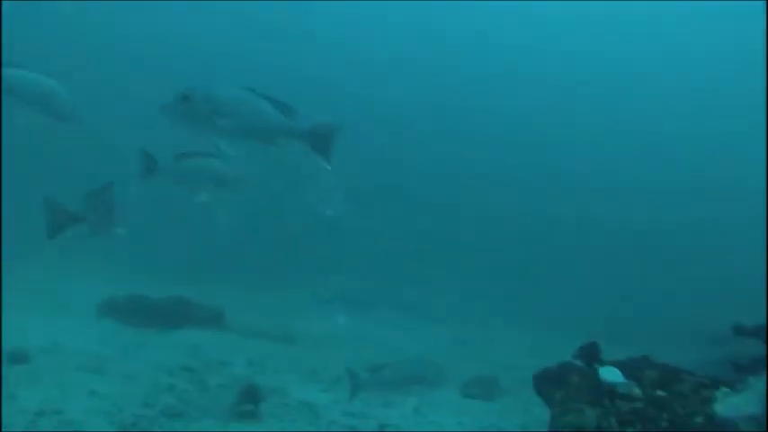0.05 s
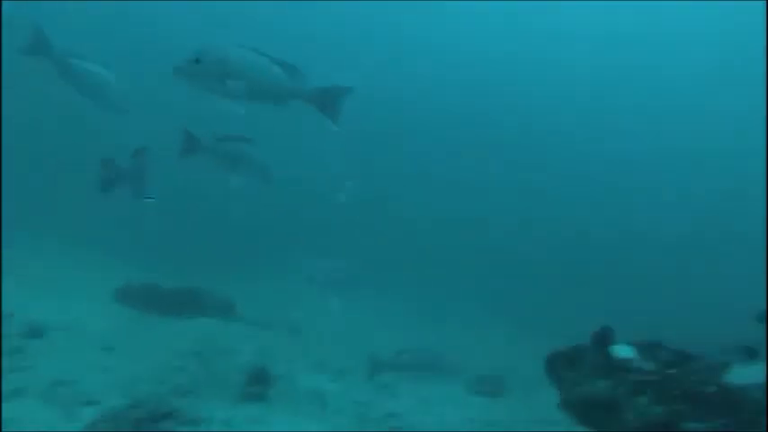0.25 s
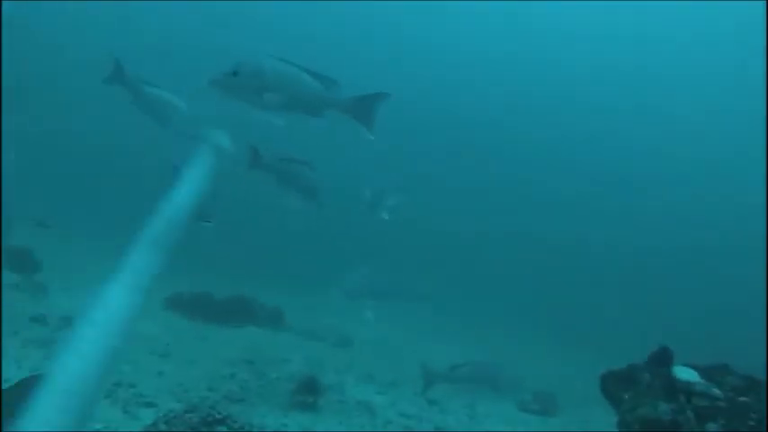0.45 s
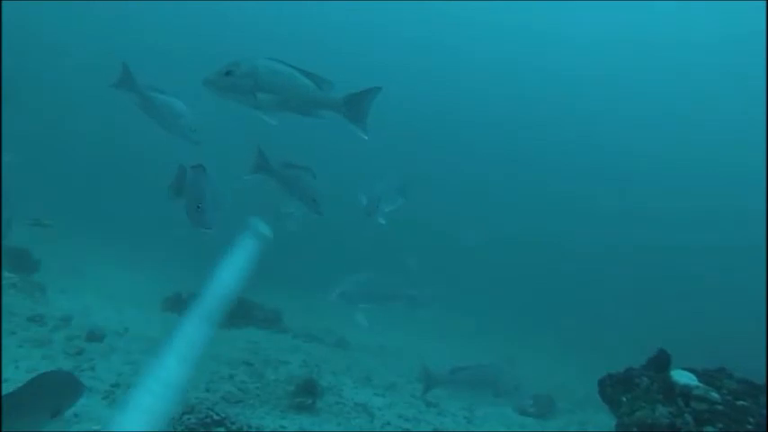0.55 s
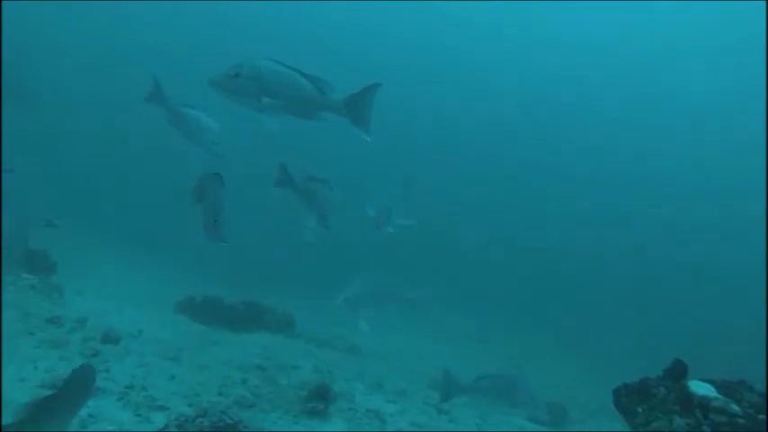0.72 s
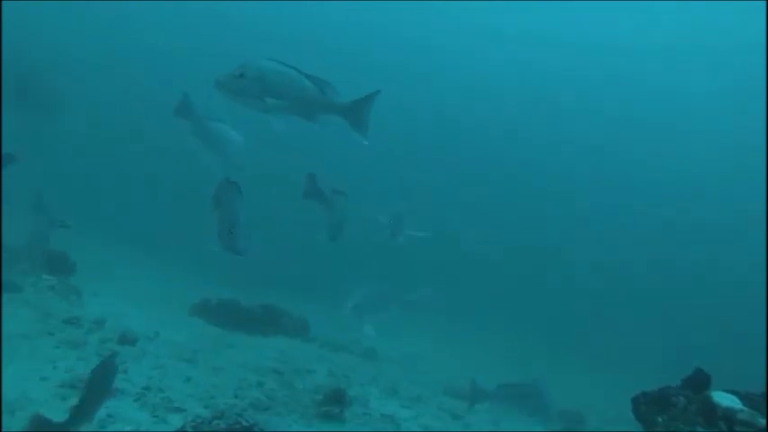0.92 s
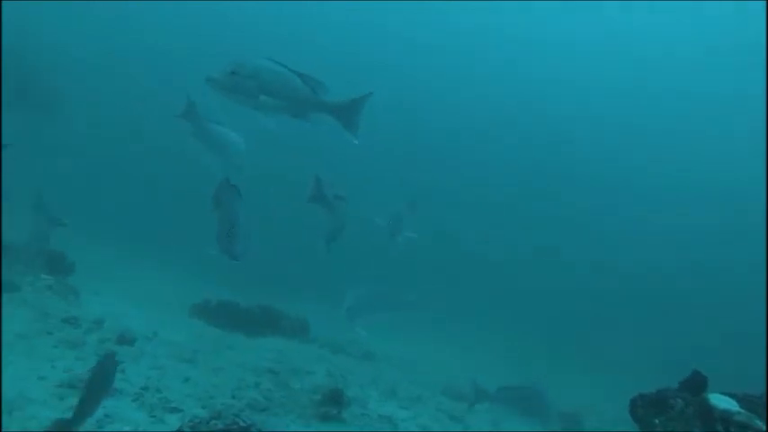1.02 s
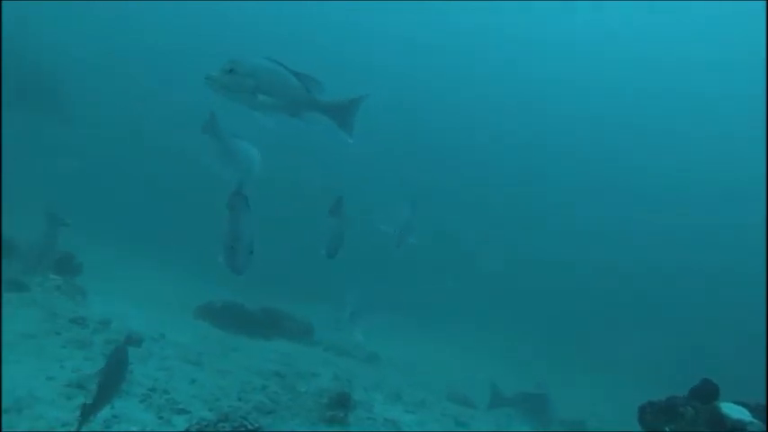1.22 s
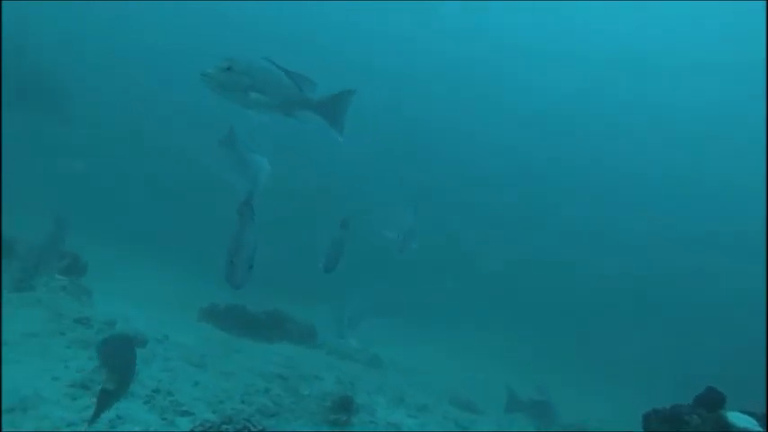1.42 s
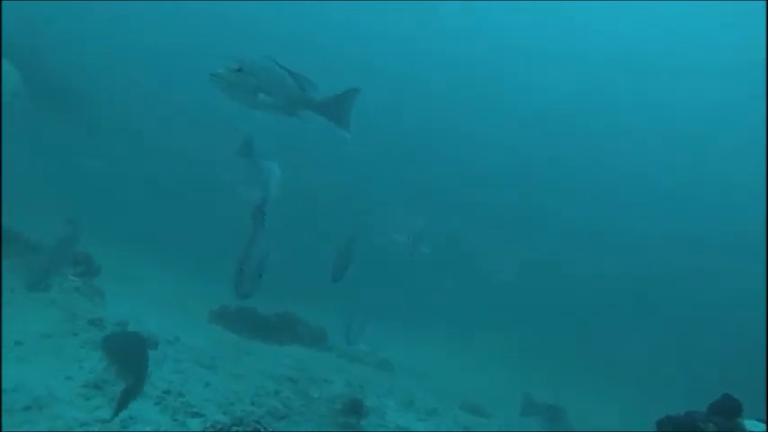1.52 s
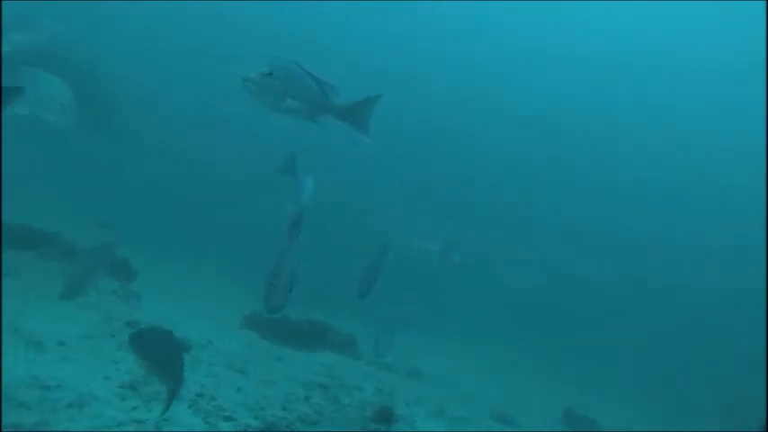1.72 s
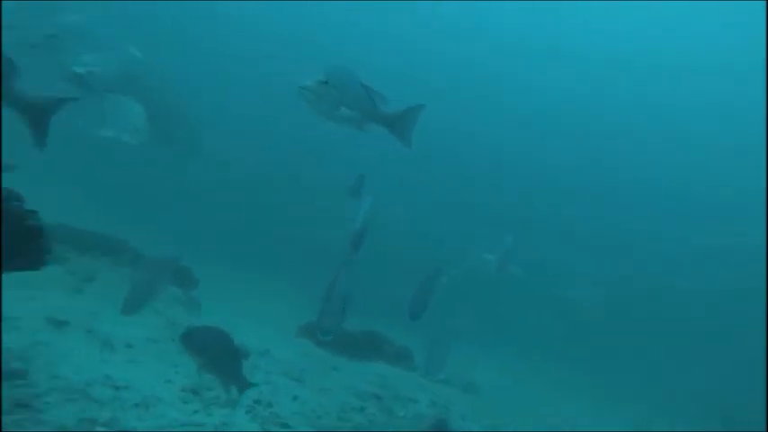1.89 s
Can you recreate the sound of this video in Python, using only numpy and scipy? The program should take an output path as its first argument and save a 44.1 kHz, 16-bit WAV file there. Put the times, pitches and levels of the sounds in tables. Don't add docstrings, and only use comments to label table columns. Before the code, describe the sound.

Underwater spear gun shot, a sharp cracking clack with a short thud and brief line rattle

```python
import sys
import numpy as np
from scipy import signal
from scipy.fft import rfft, irfft, next_fast_len
from scipy.io import wavfile
from scipy.ndimage import map_coordinates

SR = 44100
rng = np.random.default_rng(int(sys.argv[2]) if len(sys.argv) > 2 else 0)


def makeup_ratio(level_db):
    decades = np.asarray(level_db, float) / 20
    return 10 ** decades


def to_wav(sig):
    pcm = np.clip(np.atleast_2d(sig), -1, 1) * 32767
    pcm = np.round(pcm).astype(np.int16)
    wavfile.write(sys.argv[1], SR, pcm.T)


N = 85995

# (time [s], level [dB])
HISS_LEVEL = [
    (0.0, -62.5),
    (1.536, -62.5),
    (1.95, -61.5),
]
# (frequency [Hz], density [dB per Hz])
HISS_COLOUR = [(15, -23.5), (35, 5), (80, 0), (150, 0), (500, -7), (1100, -10), (2000, -11.5),
               (4500, -19.5), (9500, -26), (14400, -31), (15700, -46)]
# (time [s], peak level [dB], pitch [Hz])
SHRIMP_SNAPS = [(0.6164, -55, 6750), (0.839, -60.5, 5860), (1.1155, -58, 5060), (1.2356, -53.5, 7330),
                (1.255, -59, 6730), (1.4376, -51, 9820), (1.4425, -52.5, 9950), (1.080, -59, 9400),
                (1.682, -62, 11080), (1.5835, -60, 6420), (1.7025, -55.5, 7297), (1.8309, -56, 9300)]
# (time [s], peak level [dB], pitch [Hz])
RISING_BUBBLES = [(1.319, -53.5, 853), (1.544, -53.5, 1520), (1.624, -56, 892), (1.679, -55, 501),
                  (1.709, -48, 945), (1.759, -53, 1050), (1.776, -49.5, 1120), (1.844, -52, 1100),
                  (1.903, -56, 1820)]

# (time [s], level [dB])
CHURN_LEVEL = [
    (.25, -34.5),
    (.272, -41.5),
    (.31, -46),
    (.33, -58),
    (.39, -55),
    (.43, -50),
    (.452, -74),
    (.6, -95),
]
# (frequency [Hz], density [dB per Hz])
CHURN_COLOUR = [(60, -22), (150, 2.5), (330, -6.5), (490, 1), (1000, -7), (1600, -6.5), (4300, -23),
                (5500, -51.5)]

# (time [s], peak level [dB], pitch [Hz], rise [s])
LINE_KNOCKS = [(0.2639, -30, 2110, 0.0016), (0.2685, -37, 2140, 0.0009), (0.2697, -25, 2250, 0.0018),
               (0.2788, -23, 2310, 0.0018), (0.2865, -36, 2060, 0.0014), (0.2922, -37, 2170, 0.0009),
               (0.2953, -33, 2240, 0.001), (0.3027, -30, 2080, 0.0009), (0.309, -46, 4000, 0.0014),
               (0.3108, -37, 2180, 0.0014), (0.3167, -36, 2070, 0.0008), (0.321, -40, 2290, 0.0012),
               (0.3265, -48, 4200, 0.0016), (0.3325, -50, 4500, 0.0014), (0.3422, -19.5, 1830, 0.0016),
               (0.3448, -27, 1930, 0.0016), (0.3534, -42, 1920, 0.001), (0.359, -50, 4100, 0.001),
               (0.3593, -42, 2190, 0.001), (0.3663, -40, 2180, 0.0011), (0.3695, -43, 1990, 0.0009),
               (0.371, -41, 2160, 0.001), (0.3734, -39, 2100, 0.0015), (0.3778, -41, 2020, 0.0013),
               (0.3879, -33, 2160, 0.0015), (0.3912, -43, 1980, 0.0008), (0.3983, -40, 2390, 0.0019),
               (0.4158, -35, 2270, 0.0013), (0.4177, -39, 2180, 0.0022), (0.4327, -36, 2050, 0.0015),
               (0.4365, -42, 2290, 0.0011)]
# (time [s], peak level [dB], pitch [Hz], rise [s])
SLACK_KNOCKS = [(0.4661, -41, 2310, 0.001), (0.4832, -35, 2390, 0.0022), (0.4998, -39, 2330, 0.0015),
                (0.5374, -47, 2290, 0.001), (0.551, -32, 2350, 0.0012), (0.5549, -43, 2110, 0.0007),
                (0.558, -47, 1930, 0.0011), (0.5845, -38, 2330, 0.0013), (0.5905, -46, 2320, 0.001),
                (0.6006, -37, 2270, 0.0012), (0.6023, -37, 2290, 0.0013), (0.6562, -38, 2300, 0.0011),
                (0.6661, -43, 2260, 0.0013), (0.689, -45, 2230, 0.0009), (1.0502, -49, 2160, 0.001),
                (1.058, -45, 2160, 0.0011), (1.0723, -41, 2190, 0.0011), (1.0741, -52, 2360, 0.0006),
                (1.0798, -46, 2310, 0.0011), (1.6228, -49, 2050, 0.0011)]
# (pitch ratio [1], relative level [dB])
KNOCK_SIDE_MODES = [(.52, -13), (.25, -21), (1.85, -21), (.74, -13), (1.35, -18)]
# (time [s], level [dB])
RUSTLE_LEVEL = [
    (.255, -55),
    (.30, -48),
    (.34, -50),
    (.44, -58),
    (.46, -61),
    (.56, -55),
    (.62, -70),
    (.70, -68),
    (.8, -76),
]
# (frequency [Hz], density [dB per Hz])
RUSTLE_COLOUR = [(500, -31), (1200, -14), (1700, -5.5), (2300, 0.5), (2800, -12), (4300, -17), (5300, -35),
                 (9000, -59.5)]

# (frequency [Hz], level [dB])
SHUDDER_MODES = [(75, -33.5), (148, -33.5), (250, -46)]
# (time [s], level [dB], pitch [Hz], rise [s], 60 dB decay [s])
RUBBER_SLAPS = [
    (0.2423, -17.5, 43.3, 0.015, 0.1),
    (0.25, -19, 194, 0.0029, 0.023),
    (0.25, -9.5, 285, 0.00045, .012),
    (0.407, -48.5, 34, 0.02, 0.19),
    (.53, -50, 36.3, 0.058, 0.24),
    (.68, -58.5, 47, 0.0298, 0.26),
    (1.69, -56, 42.1, 0.024, 0.28),
    (1.67, -64.5, 162, .09, 1.8),
    (.475, -56, 33, .04, .3),
]

# (delay [s], pitch [Hz], relative level [dB], rise [s], 60 dB decay [s])
TRIGGER_MODES = [
    (0, 549, -1, 0.0028, 0.005),
    (.0004, 1744, -8, 0.0021, 0.0054),
    (.0045, 1780, -27.5, 0.0011, 0.028),
    (0, 2870, -29.5, 0.0028, .005),
    (.0035, 690, -17, 0.0014, 0.0057),
    (.008, 296, -31, 0.0016, 0.0087),
]

# (time [s], peak level [dB], pitch [Hz], rise [s])
SHAFT_JOLTS = [(0.2306, -23, 3440, 0.0012), (0.2308, -16, 2280, 0.0009), (0.2321, -9, 2150, 0.0011),
               (0.2328, -13, 1330, 0.002), (0.2334, -21, 4100, 0.0006), (0.2335, -12, 2160, 0.0006),
               (0.2342, -17, 3510, 0.0005), (0.2342, -6, 2330, 0.0013), (0.2347, -17, 3190, 0.0006),
               (0.2355, -14, 3460, 0.0008), (0.2361, -5, 2430, 0.001), (0.2372, -18, 3410, 0.0006),
               (0.2374, -23, 1060, 0.0017), (0.2378, -14, 1960, 0.001), (0.2391, -23, 3560, 0.0006),
               (0.2397, -23, 3490, 0.0005), (0.2398, -6, 2080, 0.001), (0.2404, -16, 1150, 0.0012),
               (0.2406, 0.5, 2250, 0.0019), (0.2409, -18, 3580, 0.0009), (0.242, -16, 1290, 0.001),
               (0.2423, -22, 3870, 0.0006), (0.2429, -24, 3990, 0.0006), (0.2441, -21, 4260, 0.0005),
               (0.2441, -14, 2090, 0.001), (0.2448, -22, 4340, 0.0007), (0.2453, -6, 2160, 0.0009),
               (0.2463, -21, 3640, 0.0004), (0.2471, -21, 1260, 0.001), (0.248, -12, 2420, 0.001),
               (0.2491, -21, 950, 0.0009), (0.2497, -19, 1850, 0.0009), (0.2505, -15, 2170, 0.001),
               (0.2506, -6, 1360, 0.0013), (0.2515, -18, 3730, 0.0006), (0.2516, -13, 2110, 0.001),
               (0.2523, -24, 3560, 0.0008), (0.2533, -17, 1420, 0.0009), (0.2537, -23, 4340, 0.001),
               (0.2538, -17, 2170, 0.0013), (0.2545, -22, 1210, 0.0013), (0.2559, -23, 1290, 0.0014),
               (0.256, -24, 4430, 0.0006), (0.256, -15, 2280, 0.001), (0.2574, -17, 2220, 0.0012),
               (0.2597, -24, 2180, 0.0014)]
# (time [s], peak level [dB], pitch [Hz], rise [s])
OUTER_JOLTS = [
    (.2501, -18, 750, .001),
    (.2563, -24, 7000, .0005),
    (.2345, -24, 690, .002),
]
# (time [s], level [dB])
SCRAPE_LEVEL = [
    (.2296, -62.5),
    (.2305, -42),
    (.234, -31),
    (.2572, -26.5),
    (.2605, -47),
    (.29, -57.5),
    (.30, -62),
]
# (frequency [Hz], density [dB per Hz])
GRIT_COLOUR = [(150, -15.5), (300, -7.5), (1300, -0.5), (2200, -2), (3300, -4), (4600, -8.5), (7000, -18.5),
               (11000, -36), (15500, -51.5)]

# (start [s], end [s], edge [Hz]: losses grow from about half of it, surviving lines
THINNED = [(.088, .132, 5000), (.306, .320, 6000), (.548, .562, 6000), (.778, .796, 6000),
           (.812, .832, 5000), (.988, 1.022, 6000), (1.134, 1.152, 6000), (1.178, 1.196, 5000),
           (1.264, 1.280, 6000), (1.308, 1.352, 5000), (1.482, 1.50, 5000), (1.634, 1.652, 5000),
           (1.738, 1.754, 5000)]
# (start [s], end [s], above [Hz])
DULLED = (.30, .72, 5500)


def unit(x):
    return x / np.sqrt(np.mean(x ** 2) + 1e-20)


def curve(rows):
    times, levels = np.transpose(rows)
    return np.interp(np.arange(N) / SR, times, levels, left=-120, right=-120)


def wobble(rate):
    knots = rng.standard_normal(int(N * rate / SR) + 4)
    return map_coordinates(knots, [np.arange(N) * rate / SR])


def noise(spectrum):
    size = next_fast_len(N + 8192)
    hz, db = np.transpose(spectrum)
    gain = makeup_ratio(np.interp(np.log(np.fft.rfftfreq(size, 1 / SR) + 1), np.log(hz + 1), db))
    return unit(irfft(rfft(rng.standard_normal(size)) * gain, size)[:N])


def ring(start_s, db, hz, rise_s, t60_s, glide=0):
    out = np.zeros(N)
    first = int(start_s * SR) + 1
    last = min(N, int((start_s + rise_s + 1.5 * t60_s) * SR))
    t = np.arange(first, last) / SR - start_s
    onset = np.sin(np.pi / 2 * np.minimum(t / rise_s, 1)) ** 2
    decay = makeup_ratio(-60 * np.maximum(t - rise_s, 0) / t60_s)
    out[first:first + len(t)] = makeup_ratio(db) * (onset * decay) * np.sin(2 * np.pi * hz * t * (1 + glide * t))
    return out


def reef():
    level_db = curve(HISS_LEVEL)
    mean_db = np.mean(np.transpose(HISS_LEVEL)[1])
    swell_db = 0.77 * (level_db - mean_db)
    flutter_db = .7 * wobble(9) + .7 * wobble(50)
    hiss = makeup_ratio(mean_db + swell_db + 2 + flutter_db) * noise(HISS_COLOUR)
    snaps = np.zeros(N)
    for s, db, hz in SHRIMP_SNAPS:
        for ratio in (.8, 1, 1.3):
            snaps += ring(s, db + 2.5, hz * ratio, 0.00018, 0.005) / 2
    bubbles = sum(ring(s, db - 1.5, hz, 0.0017, 0.02, glide=6.3) for s, db, hz in RISING_BUBBLES)
    return hiss + snaps + bubbles


def churn():
    return makeup_ratio(curve(CHURN_LEVEL)) * noise(CHURN_COLOUR) * makeup_ratio(3 * wobble(130))


def line():
    t60_rises, tap_db = 5.5, .5
    taps = np.zeros(N)
    knocks = list(LINE_KNOCKS) + list(SLACK_KNOCKS)
    for s, db, hz, rise in knocks:
        taps += ring(s, db + tap_db, hz, rise, t60_rises * rise)
        for ratio, mode_db in KNOCK_SIDE_MODES:
            level_draw, pitch_draw = rng.standard_normal(2)
            side_db = db + tap_db + mode_db + 2.5 * level_draw
            side_hz = hz * ratio * (1 + .07 * pitch_draw)
            taps += ring(s, side_db, side_hz, .8 * rise, .6 * t60_rises * rise)
    rustle = unit(noise(RUSTLE_COLOUR) * makeup_ratio(3.5 * wobble(200)))
    return taps + makeup_ratio(curve(RUSTLE_LEVEL)) * rustle


def shudder():
    start_s, settled_s, sag_db_per_s = 0.23, 0.347, 65
    t = np.arange(N) / SR - start_s
    settling_s = np.maximum(t + start_s - settled_s, 0)
    gate = np.clip(t / .008, 0, 1) * makeup_ratio(-sag_db_per_s * t - 830 * settling_s)
    return gate * sum(makeup_ratio(db) * np.sin(2 * np.pi * hz * t) for hz, db in SHUDDER_MODES)


def trigger():
    start_s, level_db = .0600, -17
    return sum(ring(start_s + delay, level_db + db, hz, rise, t60)
               for delay, hz, db, rise, t60 in TRIGGER_MODES)


def shot():
    jolts = np.zeros(N)
    for s, db, hz, rise in list(SHAFT_JOLTS) + list(OUTER_JOLTS):
        jolts += ring(s, db + 1, hz, rise, 4.5 * rise)
    rasp = noise(GRIT_COLOUR) * makeup_ratio(2.7 * wobble(700))
    brighten_s = 0.02291
    speed = np.clip((np.arange(N) / SR - SHAFT_JOLTS[0][0]) / brighten_s, 0, 1)
    edge = np.diff(rasp, 2, prepend=[0, 0])
    grit = makeup_ratio(curve(SCRAPE_LEVEL) + 7) * (rasp + 1.5 * speed * edge)
    slaps = sum(ring(*slap) for slap in RUBBER_SLAPS)
    return jolts + grit + slaps


def scene():
    return (reef() + churn() + line() + shudder() + trigger() + shot())[None]


def thin_treble(x):
    survive_hz, hole_db, line_db = 2200, -24, 4
    hz, t, z = signal.stft(x, SR, nperseg=768, noverlap=672)
    gain = np.ones(z.shape[1:]) * (hz < 15700)[:, None]
    dull_start, dull_end, dull_hz = DULLED
    gain[np.ix_(hz > dull_hz, (t > dull_start) & (t < dull_end))] = makeup_ratio(-2.5)
    for start, end, top in THINNED:
        luck = np.repeat(rng.random(len(hz) // 2 + 1), 2)[:len(hz)]
        kept = luck < np.exp(-(hz - top / 2) / survive_hz) + .08
        line_gain = np.where(kept, makeup_ratio(line_db * (hz > top)), makeup_ratio(hole_db))
        gain[:, (t > start) & (t < end)] *= line_gain[:, None]
    return signal.istft(z * gain, SR, nperseg=768, noverlap=672)[1][:, :N]


def low_pass(x):
    return signal.sosfilt(signal.butter(12, 15770, fs=SR, output="sos"), x)


def record(dry):
    limit, hardness = 1.02, 12
    clipped = dry / (1 + np.abs(dry / limit) ** hardness) ** (1 / hardness)
    mix = thin_treble(clipped)
    return low_pass(mix)


dry = scene()
out = record(dry)
to_wav(out)
```